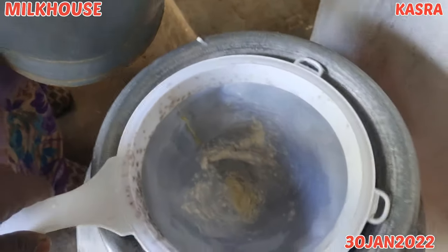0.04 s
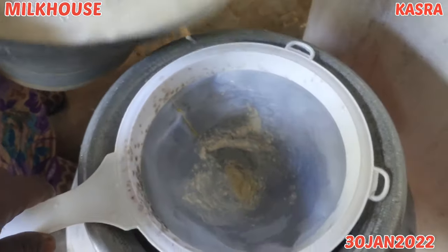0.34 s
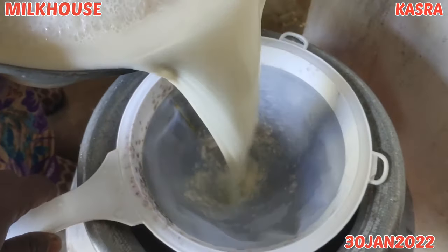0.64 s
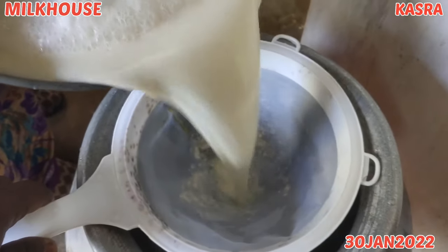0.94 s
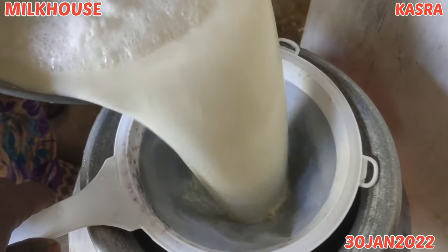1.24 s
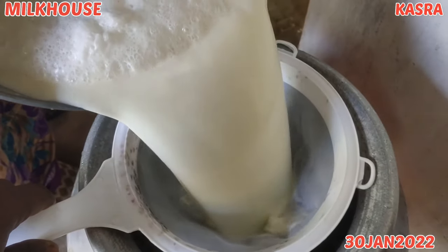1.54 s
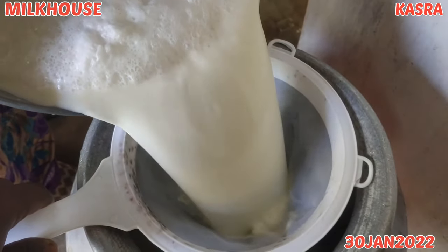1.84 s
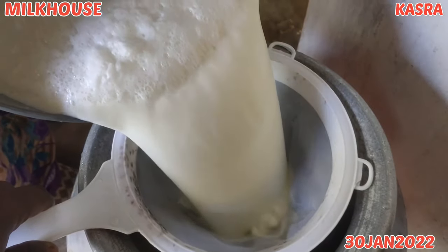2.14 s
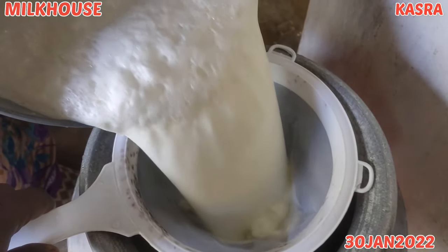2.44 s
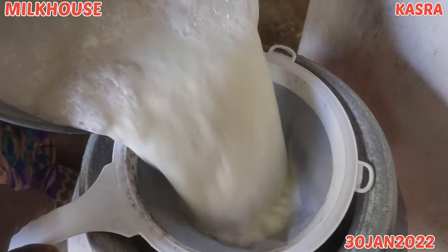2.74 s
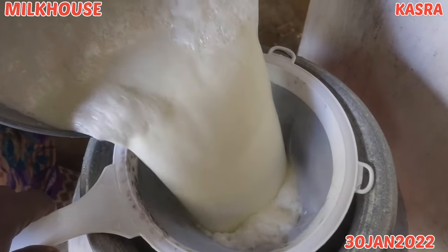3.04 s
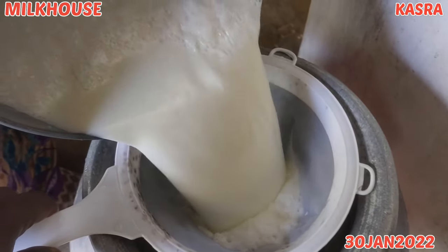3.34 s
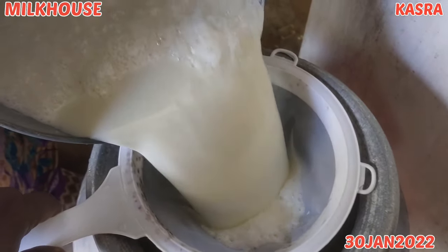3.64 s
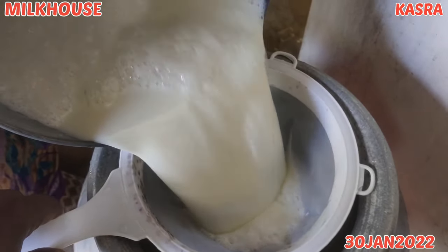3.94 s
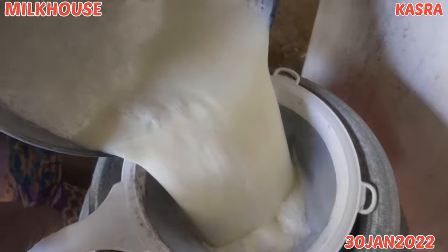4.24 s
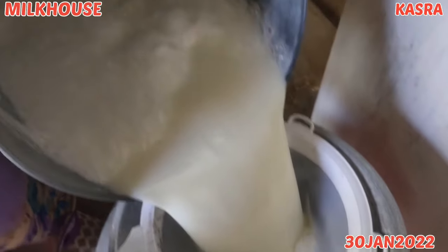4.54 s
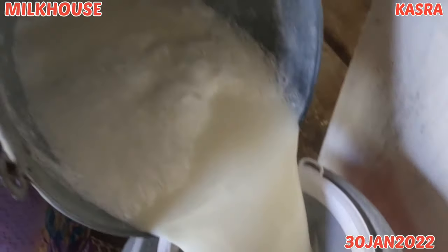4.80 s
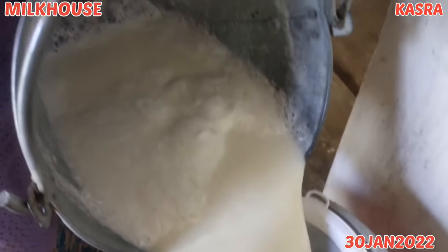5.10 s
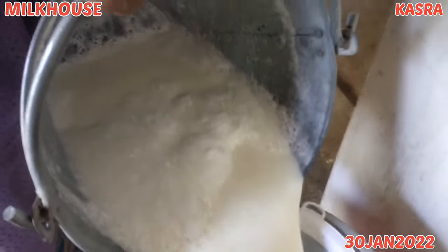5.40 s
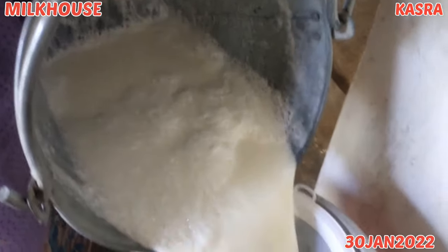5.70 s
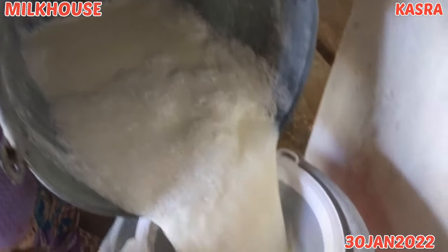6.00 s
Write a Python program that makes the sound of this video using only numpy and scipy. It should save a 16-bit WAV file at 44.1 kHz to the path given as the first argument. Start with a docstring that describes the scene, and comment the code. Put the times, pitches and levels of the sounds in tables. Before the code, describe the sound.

Milk slides softly in a metal pail, then slaps and spatters on the bare mesh of a plastic strainer. The stream swells into a bubbling splash, and the gurgle deepens as the strainer fills. Air gulps past the rim, froth hisses and the metal can below drones faintly. The pour then thins to a lighter, hollow trickle. It is heard close up in a small, hard room.

```python
"""Milk through a strainer

Close by, milk is tipped from a metal pail through a plastic strainer into a metal can.
It slides softly in the pail and slaps the bare mesh, then the stream drives clouds of ringing bubbles
into a pool. The gurgle deepens as the strainer fills and thins as the pour eases. Air gulps past
the rim, froth hisses, and the air in the can drones below, climbing as the can fills."""
import sys
import numpy as np
from scipy import signal
from scipy.io import wavfile
from scipy.ndimage import uniform_filter1d

SR = 44100
rng = np.random.default_rng(int(sys.argv[2]) if len(sys.argv) > 2 else 0)


def wav_record(signal):
    """Record a signal, one row per channel, as 16-bit PCM in the file named by sys.argv[1]."""
    frames = np.transpose(np.atleast_2d(signal))
    bounded = np.clip(frames, -1, 1)
    # unit amplitude maps onto the largest positive 16-bit level
    quanta = np.round(bounded * 32767).astype(np.int16)
    wavfile.write(sys.argv[1], SR, quanta)


N = 276066
T = np.arange(N) / SR
STEADY_DB = -48  # force of a steady pour

# force of the stream: it sputters, breaks off, pours fully and eases (time [s], level [dB])
POUR_FORCE = [(.68, -54.5), (.74, -55.5), (.808, -46), (.845, -49.5), (.89, -48.5), (.918, -50), (.97, -47),
              (1.0, -53.5), (1.045, -40.5), (1.06, -54), (1.09, -48.5), (1.11, -59), (1.15, -56),
              (1.19, -46), (1.33, -47), (1.42, -42), (1.52, -41.5), (1.6, -38.5), (1.8, -38.5),
              (2.08, -37.5), (2.42, -43), (2.8, -42.5), (3.72, -47.5), (3.95, -46), (4.4, -47.5),
              (4.83, -51.5), (4.93, -49), (4.99, -50), (5.08, -52), (5.3, -53), (6.05, -56.5), (6.16, -54),
              (6.26, -56.5)]
# the pool in the strainer (time [s], depth [0 bare mesh to 1 full])
POOL_DEPTH = [(.7, 0), (1.15, 0.07), (1.45, 0.37), (2.05, 0.7), (2.55, 0.72), (2.95, 0.89), (4.4, 0.94),
              (5.1, 0.8), (5.75, 0.68), (6.26, 0.75)]
# tone of each bubble size, largest first, then of the froth (frequency [Hz], level [dB])
GURGLE_EQ = [(200, -17.5), (270, -1.5), (400, -5), (650, 1), (800, 4.5), (950, 3), (1150, -2)]
BURBLE_EQ = [(750, -49.5), (950, -1), (1100, 3), (1400, 3), (1700, 1.5), (2100, -34)]
SPLASH_EQ = [(1350, -14.5), (1750, 6), (2300, 2), (3000, 5), (3550, 5.5), (4300, -0.5)]
PATTER_EQ = [(2900, -26), (3650, 3), (4250, -4), (4800, 1.5), (5450, 1.5), (5900, -3), (7000, -19)]
FIZZ_EQ = [(5200, -19), (6400, 2), (7300, 0.5), (9000, 1.5), (10900, 3), (12700, -3), (14200, 0),
           (15400, 2)]
FROTH_EQ = [(9000, -18), (12700, -3), (14000, -7), (15400, 5), (16000, -15)]
# bubble clouds, gurgle to patter
# (rate [1/s], nominal decay [cycles], surge depth [dB], level spread [dB], wash [dB])
CLOUDS = [(800, 6.2, 2.5, 3.5, 0), (527.5, 3.45, 2.5, 1, 8), (979, 11.4, 2, 0, 3), (1487, 13.8, 2, 6, 7)]
# a deeper pool traps larger bubbles: the mix, gurgle to fizz (bare mesh [dB], half full [dB], full [dB])
SIZE_MIX = [(-25.5, -17.5, -3.5), (-14.5, -7, -2.5), (-7.5, -1, -1), (-4, 0.97, -3.5), (-3, -8.5, -11.5)]
# air modes above the pool; the lower gives way to the upper (time [s], pitch [Hz], level [dB])
LOW_POOL_MODE = [(1.3, 1184, -5.5), (1.75, 1106, -9), (2.1, 1110, -1), (2.3, 1110, 2), (2.5, 1085, 4),
                 (2.75, 1175, 1.5), (3.1, 1186, -1.5), (3.35, 1190, -16)]
HIGH_POOL_MODE = [(1.3, 1254, 0), (1.8, 1340, -14), (2.8, 1365, -4.5), (3.15, 1340, -2), (3.5, 1340, -3.5),
                  (3.85, 1340, 0), (4.5, 1348, -3), (4.75, 1370, -24), (5.4, 1440, -4.5)]
# their overtones (pitch [multiple of the mode], width [Hz], level [dB])
POOL_OVERTONES = [(1.131, 62, -1.5), (1.705, 70.5, -2), (1.885, 65, -6.5), (2.25, 88, -9)]
# air modes of the can, of a gulp in it, and above the bare mesh (pitch [Hz], width [Hz], level [dB])
CAN_MODES = [(470, 32, 9), (637, 34, -1), (710, 58, -2), (1694, 49, 0.5), (1881, 13, -4.5), (2875, 63, -1),
             (3020, 48, -9), (3330, 37, -3), (4230, 270, -0.5)]
GULP_MODES = [(219, 53, 8), (298, 23, -10.5), (386, 25, 2), (509, 43, 5), (648, 43, 5), (720, 100, -1),
              (980, 210, -2.5)]
BARE_MESH_MODES = [(737, 68, 6), (1274, 130, -14), (1790, 78, 5), (2550, 33, -11), (2900, 47, -10),
                   (3880, 170, 5.5), (4250, 150, 2), (4720, 330, 7), (5130, 330, 6.5)]
# the largest bubbles, and knocks near 1300 Hz that ring the air above the pool (time [s], level [dB], pitch
# [Hz], decay [s], spray against the ring [dB])
PLOPS = [(0.821, -50, 1290, 0.0027, -4), (.86, -43, 1240, .003, 0.5), (0.885, -38, 3970, 0.0027, -8),
         (0.966, -41, 4100, 0.0012, 3), (1.024, -42, 4770, .002, 0), (1.038, -46, 2130, .003, -8),
         (1.038, -39.5, 4600, 0.0022, 3.5), (1.069, -19, 4830, 0.00085, -22),
         (1.095, -43, 1280, .003, -8), (1.289, -38.5, 1245, 0.0088, -9),
         (1.293, -36, 2080, 0.0046, -9), (1.449, -30, 2920, 0.0047, 0), (1.594, -31, 2120, 0.0036, 5),
         (1.651, -29.5, 2320, 0.0052, -15), (1.6924, -32.5, 1335, 0.0045, -21),
         (1.737, -31, 1820, 0.006, -12), (1.765, -30.5, 4150, .0026, -0.5),
         (1.804, -27, 2550, 0.0028, 6.5), (2.0728, -31, 1350, 0.0036, 2),
         (2.075, -28.5, 460, 0.014, -16), (2.131, -33.5, 629, 0.018, -24),
         (2.335, -39, 1130, .006, -12), (2.39, -20.5, 1268, 0.0057, -7),
         (2.706, -38.5, 414, 0.037, -19), (2.8255, -30.5, 1160, 0.0043, -15),
         (2.827, -24.5, 1580, 0.0022, -5), (2.855, -28.5, 1280, 0.0028, -1),
         (2.9162, -34, 5060, 0.0018, -13), (3.0613, -33, 1346, 0.004, -12),
         (3.128, -27, 1290, 0.0034, -10), (3.297, -32, 1330, 0.0053, -6),
         (3.325, -31.5, 4500, 0.0011, -7), (3.372, -32.5, 1300, 0.0024, -3),
         (3.449, -35, 5300, .002, -7), (3.586, -33.5, 1256, 0.003, 7.5),
         (3.793, -36, 1322, 0.0085, -18), (3.839, -36, 1300, 0.0037, -13),
         (3.866, -32, 1327, 0.012, -18), (3.932, -33, 1254, 0.0081, -16),
         (4.111, -39, 1000, 0.016, -12), (4.444, -39, 2380, 0.0046, -19),
         (4.495, -40, 1340, 0.025, -15), (4.565, -31, 2750, 0.0022, -9),
         (4.605, -41.5, 3000, 0.0042, 6), (4.618, -41, 2330, .004, 2),
         (4.708, -38.5, 970, 0.0067, -13), (4.754, -41.5, 2920, 0.0057, 5),
         (4.768, -35, 2650, 0.0045, -10), (4.875, -37, 1520, 0.0029, -1),
         (4.953, -39.5, 4300, 0.0053, -7), (4.968, -39, 4260, .003, -7),
         (4.998, -38.5, 3400, 0.0025, 1), (5.116, -41, 3320, .004, -10),
         (5.176, -42, 3900, .004, -15), (5.275, -42.5, 936, 0.0048, -5),
         (5.333, -38, 3500, 0.0023, -15), (5.4484, -47, 2820, .002, 0),
         (5.491, -37.5, 2580, 0.0058, -13), (5.602, -35.5, 3460, 0.003, -4.5),
         (5.623, -42, 2780, 0.0035, -12), (5.746, -42, 3000, .003, -10),
         (5.8152, -42.5, 3430, 0.0035, 0.5), (5.844, -45, 1110, 0.0035, 4),
         (5.996, -39.5, 1030, 0.0072, 4), (6.0795, -44, 1550, 0.0054, -17),
         (6.0979, -45, 3100, 0.0039, -16), (6.15, -40, 4680, 0.0048, -6),
         (6.241, -38, 4160, 0.0026, -19)]
# bubble chains as the pool closes over the mesh (start [s], end [s], pitch [Hz], level [dB])
BUBBLE_CHAINS = [(1.353, 1.38, 3150, -36), (1.402, 1.45, 3150, -40), (1.51, 1.567, 3170, -36.5),
                 (1.75, 1.835, 3190, -38)]
# air gulps past the strainer rim (time [s], level [dB], decay [s], pitch [Hz])
AIR_GULPS = [(1.581, -53.5, 0.0085, 840), (1.751, -53.5, 0.017, 750), (1.872, -53, 0.034, 680),
             (1.999, -51, 0.012, 680), (2.235, -55.5, 0.014, 490), (2.855, -59.5, 0.061, 660),
             (2.92, -59, .03, 630), (3.011, -55, .015, 816), (3.093, -51.5, .045, 394),
             (3.251, -58, .025, 634), (3.366, -52.5, 0.028, 666), (3.458, -60, 0.01, 495),
             (3.66, -51, 0.017, 630), (3.835, -56, 0.018, 486), (3.922, -55, 0.0096, 716),
             (3.991, -56.5, 0.017, 376), (4.286, -53.5, 0.028, 730), (4.348, -52, 0.038, 620),
             (4.436, -56, 0.027, 520), (4.692, -55.5, 0.024, 300)]
# first milk on the bare mesh (time [s], thump [dB], tick [dB])
MESH_SLAPS = [(0.654, -41, -60), (.673, -47, -48), (0.71, -58, -44), (0.7456, -60, -45), (0.7608, -70, -43),
              (0.7742, -70, -45), (0.7895, -66, -39.5), (0.804, -66, -43), (0.814, -60, -47),
              (0.827, -73, -46), (0.884, -55, -46), (0.9335, -54, -56), (0.9652, -56, -55),
              (1.0064, -59, -46), (1.069, -70, -37)]
# modes of the strainer on the can (pitch [Hz], level [dB], t60 [s])
STRAINER_MODES = [(193.5, -3, 0.2), (228, -5.5, 0.093), (387, -7.5, 0.02), (700, -9.5, 0.033),
                  (1090, -31, 0.018)]
# bursting clumps of froth (time [s], level [dB], decay [s], low cut [Hz])
FROTH_POPS = [(3.1924, -37, .008, 5540), (3.355, -38, .003, 7500), (3.928, -37, 0.017, 6000),
              (4.229, -37, 0.0065, 10800)]
# the emptying pail leans over the strainer (time [s], share of the splash in it [0-1], tilt [0-1])
PAIL_LEAN = [(4.1, 0.6, 0.16), (4.6, 1, 0.17), (4.95, 1, 0.53), (5.4, 1, 0.9), (6.26, 1, 1)]
# its air modes (pitch at tilt 0 [Hz], pitch at tilt 1 [Hz], width [Hz], level [dB])
PAIL_AIR_MODES = [(730, 820, 240, -5.5), (1026, 990, 84, -2), (1384, 1530, 88, -3.5), (1590, 1500, 49, 1),
                  (2300, 2520, 280, -1.5), (2540, 2766, 78, -1.5), (3000, 3400, 135, -3),
                  (3720, 3600, 110, -7), (4190, 4100, 170, -4.5), (4660, 4700, 120, -0.5)]
# milk slides in the tilting pail (middle [s], half length [s], level [dB])
PAIL_SLIDES = [(0, 0.041, -62), (0.164, 0.1, -68.5), (0.443, 0.054, -66)]
# modes of the pail (pitch [Hz], width [Hz], level [dB], swell peak [s], half length [s], glide [Hz/s])
PAIL_MODES = [(734, 140, -8, 0.05, 0.17, 0), (1113, 87, 2.5, 0.081, 0.21, 207),
              (1278, 61, 6.5, 0.26, 0.28, 64), (1650, 110, -9, .46, 0.065, 0),
              (1880, 90, -0.5, 0.5, 0.1, -5), (2250, 280, -2, 0.055, 0.13, -900),
              (2270, 70, -5, .46, .06, 0), (2610, 190, -5, 0.058, 0.23, -200), (2560, 78, -7, .46, .06, 0),
              (2820, 90, 10, 0.3, 0.1, 0), (3180, 140, 3.5, 0.32, 0.23, -300),
              (3380, 260, -4.5, 0.067, 0.3, 2), (3840, 350, -2, .44, 0.09, -900),
              (4000, 360, -1, 0.25, 0.3, 500), (4390, 130, 3, .5, 0.17, 0),
              (4700, 210, 0.5, 0.25, 0.19, -150), (5240, 200, -1.5, 0.5, 0.14, 2)]
# the drone's trim by pool depth (bare mesh [dB], half full [dB], full [dB])
DRONE_TRIM = (-44.5, -52.5, -41)
# tone of handling and churning (frequency [Hz], level [dB])
RUMBLE_EQ = [(25, -19), (55, -16), (90, -2.5), (140, -2.5), (200, 13.5), (270, 2.5), (330, 0)]


def stream(wander_db=1.0, gurgle_wander_db=-1.0):
    """Five sizes of bubble ride the surges of the stream, under a hissing head of froth."""
    force_db, = curve(POUR_FORCE)
    depth, = curve(POOL_DEPTH)
    *levels_db, fizz_db = [force_db + by_depth(*mix) + wander_db * wander(3, 12) for mix in SIZE_MIX]
    levels_db[0] += gurgle_wander_db * wander(4, 14)
    # a thin stream is more uneven, most of all on the bare mesh
    uneven = 0.95 * np.exp(0.018 * (STEADY_DB - force_db)) + 0.2 * np.exp(-depth / 0.061)
    folds = surges(per_s=60, decay=0.0083)
    flutter = (folds - uniform_filter1d(folds, size=4000)) * uneven  # only the fast movement
    tones = [GURGLE_EQ, BURBLE_EQ, SPLASH_EQ, PATTER_EQ]
    clouds = [bubble_cloud(tone, flutter, uneven, *row) for tone, row in zip(tones, CLOUDS)]
    air_hz, air_db = np.stack([curve(LOW_POOL_MODE), curve(HIGH_POOL_MODE)], axis=1)
    clouds[1] += sum(gain(db) * pool_hollow(hz) for hz, db in zip(air_hz, air_db))
    milk = sum(gain(db) * unit_rms(can_ring(cloud)) for cloud, db in zip(clouds, levels_db))
    leads = gain(air_db) / np.linalg.norm(gain(air_db), axis=0)  # the stronger mode lends its overtones
    overtones = sum(lead * gain(db) * resonate(milk, hz * multiple, width)
                    for hz, lead in zip(air_hz, leads) for multiple, width, db in POOL_OVERTONES)
    spits = bubble_cloud(FIZZ_EQ, flutter, uneven,
                         per_s=380, cycles=20, surge_db=4, spread_db=-0.5, wash_db=-10)
    ticks = spray(2.4 * flutter)
    fizz = gain(fizz_db) * unit_rms(ticks + gain(-4.5) * spits)
    hiss = unit_rms(eq(noise(N) * gain(flutter), FROTH_EQ))
    froth = gain(0.32 * fizz_db - 49.5) * hiss  # follows the stream only in part
    return landed() * (gain(-4) * (milk + overtones) + fizz + froth)


def bubble_cloud(tone, flutter, uneven, per_s, cycles, surge_db, spread_db, wash_db):
    """Bubbles of many pitches and sizes, over the wash of those too small to tell apart."""
    out, chance = np.zeros(N), rng.random((10000, 4))
    low_hz, high_hz = tone[1][0], tone[-2][0]
    for place, pitch, size, damping in chance[:int(per_s * T[-1])]:
        hz, at = low_hz + (high_hz - low_hz) * pitch, int(place * N)
        db = spread_db * min(-np.log(size), 3.2) + surge_db * flutter[at]
        # bubbles ring longer and stand clearer of the wash where the stream is thin
        decay = uneven[at] * cycles / hz * 2 ** (2 * damping - 1)
        add(out, T[at], gain(db) * bubble(hz, decay))
    wash = unit_rms(noise(N) * gain(surge_db * flutter) / np.sqrt(uneven))
    return unit_rms(eq(unit_rms(out) + gain(wash_db) * wash, tone))


def bubble(hz, decay, rise=0.013):
    """A trapped bubble swells within a cycle, rings down and chirps slightly upward."""
    t = np.arange(int(6 * decay * SR) + 16) / SR
    ring = np.sin(2 * np.pi * hz * t * (1 + rise * t / decay / 2)) * np.exp(-t / decay)
    return ring * (1 - np.exp(-t * hz))


def surges(per_s, decay):
    """Folds of the stream collapse one after another: sudden rises that die away."""
    gaps, sizes = rng.random((2, 2000))
    at = (np.cumsum(.15 + 1.7 * gaps) / per_s * SR).astype(int)
    kicks = np.bincount(at[at < N], .5 + sizes[at < N], N)
    swell = signal.lfilter([1], [1, -np.exp(-1 / (decay * SR))], kicks)
    return unit_rms(swell - swell.mean())


def pool_hollow(hz, width=90, churn_db=-6):
    """Bursting bubbles knock on the air above the pool, which rings at one of its modes."""
    onsets = np.diff(surges(per_s=42, decay=.002), prepend=0)
    knocks = unit_rms(np.maximum(onsets, 0))
    return unit_rms(band(knocks + gain(churn_db) * noise(N), hz, width))


def spray(surge_db, per_s=350, spread_db=-1.0, wash_db=6.0, decay_s=0.0025):
    """Droplets and bursting froth: tiny bright ticks in a wash of hiss."""
    sizes = gain(spread_db * np.minimum(rng.exponential(1, N), 4.5)) * rng.choice([-1, 1], N)
    ticks = sizes * (rng.random(N) < per_s / SR)
    energy = signal.lfilter([1], [1, -np.exp(-1 / (decay_s * SR))], ticks ** 2)
    envelope = (unit_rms(np.sqrt(energy)) + gain(wash_db)) * gain(surge_db)
    return unit_rms(eq(envelope * noise(N), FIZZ_EQ))


def stray_bubbles(per_s=16, low_hz=1200, high_hz=5000, cycles=13, lift_db=4.5):
    """Mid-sized bubbles poke out of the stream at random, the more so where it is thin."""
    force_db, = curve(POUR_FORCE)
    out, chance = np.zeros(N), rng.random((400, 3))
    for place, pitch, _ in chance[:int(per_s * T[-1])]:
        hz, at = low_hz * (high_hz / low_hz) ** pitch, int(place * N)
        db = lift_db + STEADY_DB + 0.7 * (force_db[at] - STEADY_DB)
        add(out, T[at], gain(db) * bubble(hz, cycles / hz))
    return landed() * gain(by_depth(bare_db=2, half_db=-2.5, full_db=0)) * can_ring(out)


def plops(echo_s=.0035, echo_db=-9, spray_s=0.022, spray_width=0.45, crest_db=7):
    """A large bubble, or a knock on the air above the pool, rings, echoes off the strainer wall and trails a
    spray around its pitch."""
    out, t = np.zeros(N), np.arange(SR // 10) / SR
    for s, db, hz, decay, spray_db in PLOPS:
        ring = bubble(hz, decay)
        ring = gain(db) * ring / abs(ring).max()
        trail = unit_rms(band(noise(len(t)), hz, spray_width * hz)) * np.exp(-t / spray_s)
        add(out, s, ring)
        add(out, s + echo_s, gain(echo_db) * ring)
        add(out, s, gain(db + spray_db - crest_db) * trail)
    return eq(out, [(300, -11.5), (5400, 0.5), (6600, -5.5), (15000, 11)])


def glugs(attack_s=0.0069, breadth=0.66):
    """Each gulp of air is a short, rounded churn that rings the can's modes nearest its pitch."""
    out, t = np.zeros(N), np.arange(SR // 4) / SR
    for s, db, decay, hz in AIR_GULPS:
        envelope = np.minimum(t / attack_s, 1) * np.exp(-t / decay)
        churn = band(noise(len(t)), hz, breadth * hz) * envelope
        gulp = ring_modes(churn, GULP_MODES)
        power = np.sum(gulp ** 2) / (2 * decay * SR)
        add(out, s, gain(db) * gulp / np.sqrt(power))
    return out


def bubble_chains(per_s=125, detune=0.028, decay_s=0.0052, spread_db=2.5):
    """Bubbles of nearly one size follow each other closely, in a rough singing note."""
    out = np.zeros(N)
    for start, end, hz, db in BUBBLE_CHAINS:
        for k, (late, pitch, size) in enumerate(rng.uniform(-1, 1, (20, 3))):
            s = start + (k + late / 2) / per_s
            if s < end:
                add(out, s, gain(db + spread_db * size) * bubble(hz * (1 + detune * pitch), decay_s))
    return out


def mesh_slaps(tick_s=0.0012, splat_s=0.018, splat_db=-10.5, spatter_s=0.015, spatter_db=-12):
    """Milk thumps the dry strainer with a dull splat and ticks on its mesh, trailing fine spatter."""
    out, t = np.zeros(N), np.arange(SR // 4) / SR
    tick_eq = [(300, -38), (5000, 16), (6500, 7.5), (15000, 10)]
    splat_eq = [(200, -11), (1100, -1), (1700, -11), (4000, -7.5), (7000, -26), (15000, -17)]
    ring = sum(gain(db - 60 * t / t60) * np.sin(2 * np.pi * hz * t) for hz, db, t60 in STRAINER_MODES)
    tick_envelope = np.exp(-t / tick_s) + gain(spatter_db) * np.exp(-t / spatter_s)
    for s, thump_db, tick_db in MESH_SLAPS:
        tick = shaped_noise(len(t), tick_eq) * tick_envelope
        splat = shaped_noise(len(t), splat_eq) * np.exp(-t / splat_s)
        thump = eq(ring + gain(splat_db) * splat, [(160, 0), (15000, 0)])
        add(out, s, gain(thump_db) * thump + gain(tick_db + 2) * tick)
    return out


def froth_pops(crest_db=7):
    """A clump of froth bursts in a quick, bright crackle."""
    out, t = np.zeros(N), np.arange(SR // 10) / SR
    for s, db, decay, low_hz in FROTH_POPS:
        grit = noise(len(t)) * rng.exponential(1, len(t))
        crackle = unit_rms(eq(grit, [(low_hz, 0), (15400, 0)]))
        add(out, s, gain(db - crest_db) * crackle * np.exp(-t / decay))
    return out


def can_ring(x):
    """The direct sound plus the ringing air of the can."""
    click = signal.unit_impulse(4096)
    return signal.oaconvolve(x, click + ring_modes(click, CAN_MODES))[:len(x)]


def air_spaces(x, covered_depth=0.12):
    """The splash rings above the mesh until the pool covers it, and in the emptying pail at the end."""
    depth, = curve(POOL_DEPTH)
    share, tilt = curve(PAIL_LEAN)
    x = cavity(x, BARE_MESH_MODES, 1 - depth / covered_depth, direct_db=-10)
    modes = [(start + (end - start) * tilt, width, db) for start, end, width, db in PAIL_AIR_MODES]
    return cavity(x, modes, share, direct_db=-3)


def cavity(x, modes, share, direct_db):
    """A share of the sound passes through an air space, which favours its modes and dulls the rest."""
    share = np.clip(share, 0, 1)
    return (1 - share) * x + share * (gain(direct_db) * x + ring_modes(x, modes))


def pail_slide(rest_db=-13, hiss_db=-30, waver=.008, flicker_db=1.5, fade_s=.04):
    """Milk slides along the pail wall before it spills; the modes swell, waver and glide as it tilts."""
    out, t = np.zeros(N), T[T < .7]
    slide = noise(len(t)) * gain(1.4 * surges(per_s=45, decay=0.012)[:len(t)])
    hiss_eq = [(500, 0), (2500, -2), (5200, 9), (7000, 1), (9000, -20), (15000, -29)]
    ringing = gain(hiss_db) * eq(slide, hiss_eq)
    for hz, width, db, s, half, glide in PAIL_MODES:
        drift = uniform_filter1d(uniform_filter1d(noise((2, len(t))), size=1500), size=1500)
        bend, flicker = map(unit_rms, drift)
        swell = (gain(rest_db) + np.exp(-((t - s) / half) ** 2)) * gain(flicker_db * flicker)
        pitch = hz * (1 + waver * bend) + glide * (t - s)
        ringing += gain(db) * swell * band(slide, pitch, width)
    add(out, 0, levelled(ringing, 3000) * np.minimum((t[-1] - t) / fade_s, 1))
    return slide_envelope() * out


def slide_envelope(rest_db=-78.5):
    """Each slide of milk in the pail swells and fades."""
    swells = sum(gain(db) ** 2 * np.exp(-((T - s) / half) ** 2) for s, half, db in PAIL_SLIDES)
    return np.sqrt(swells + gain(rest_db) ** 2)


def can_drone(empty_hz=176.3, filled=0.55, width=62, follow=0.42, wander_db=2.0):
    """The can's air booms at its neck and climbs as it fills, over a rumble of handling and churning."""
    force_db, = curve(POUR_FORCE)
    depth, = curve(POOL_DEPTH)
    pouring = landed()
    hz = empty_hz / np.sqrt(1 - filled * np.cumsum(depth) / depth.sum())
    pour_level = gain(follow * force_db + by_depth(*DRONE_TRIM) + wander_db * wander(2.2, 5.8))
    level = pouring * pour_level + (1 - pouring) * gain(-4) * slide_envelope()
    boom = unit_rms(band(noise(N), hz, width))
    churn_db, handling_db = -4.5 + follow * (force_db - STEADY_DB), -2
    rumble = gain(pouring * churn_db + (1 - pouring) * handling_db) * shaped_noise(N, RUMBLE_EQ)
    low_end = eq(boom + rumble, [(20, 8), (230, -2), (330, -11.5)])
    return level * levelled(low_end, 5000)


def room_reverb(x, t60=0.31, per_s=3000, predelay_s=.004):
    """A small hard room: sparse reflections that die quickly."""
    t = np.arange(SR // 2) / SR
    taps = noise(len(t)) * (rng.random(len(t)) < per_s / SR) * (t > predelay_s)
    tail = eq(taps * gain(-60 * t / t60), [(100, 2.2), (5000, 4.6), (15000, 2.6)])
    return signal.oaconvolve(x, tail / np.linalg.norm(tail))[:N]


def room_tone():
    """Still air: a faint bed of rumble and hiss."""
    return gain(-92.5) * shaped_noise(N, [(25, -1), (100, 23), (400, -10), (3000, -9), (15000, 6)])


def landed():
    """A gate that opens as the first milk reaches the mesh."""
    return np.clip((T - .671) / .004, 0, 1)


def by_depth(bare_db, half_db, full_db):
    """A level that rides the depth of the pool."""
    depth, = curve(POOL_DEPTH)
    return np.polyval(np.polyfit([0, .5, 1], [bare_db, half_db, full_db], 2), depth)


def wander(low_hz, high_hz, count=16):
    """Slow random modulation, rms 1."""
    rates, phases = np.geomspace(low_hz, high_hz, count), rng.random(count)
    t = T[::256]
    waves = np.sin(2 * np.pi * (np.outer(t, rates) + phases))
    return unit_rms(np.interp(T, t, waves.sum(1)))


def resonate(x, hz, width):
    """A resonance of gain 1 at a fixed or moving pitch."""
    turn = np.exp(2j * np.pi * np.cumsum(hz * np.ones(len(x))) / SR)
    pole = np.exp(-np.pi * width / SR)
    return 2 * (turn * signal.lfilter([1 - pole], [1, -pole], x / turn + 1e-18)).real


def band(x, hz, width):
    """Two resonances in series, for steeper skirts."""
    return resonate(resonate(x, hz, width), hz, width)


def ring_modes(x, modes):
    """A bank of resonances in parallel."""
    return sum(gain(db) * resonate(x, hz, width) for hz, width, db in modes)


def eq(x, points, size=4096):
    """Minimum-phase EQ through (frequency [Hz], level [dB]), falling 36 dB an octave past both ends."""
    hz, db = np.transpose(points)
    octave, knots = np.log2(abs(np.fft.fftfreq(size, 1 / SR)) + 1), np.log2(hz)
    outside = abs(octave - np.clip(octave, knots[0], knots[-1]))
    log_gain = np.log(gain(np.maximum(np.interp(octave, knots, db) - 36 * outside, -90)))
    taps = np.fft.ifft(np.exp(np.conj(signal.hilbert(log_gain)))).real
    return signal.oaconvolve(x, taps)[:len(x)]


def noise(shape):
    """White noise."""
    return rng.standard_normal(shape)


def shaped_noise(samples, tone):
    """Noise through an EQ, rms 1."""
    return unit_rms(eq(noise(samples), tone))


def gain(db):
    """Decibels to amplitude."""
    return 10 ** (np.asarray(db) / 20)


def unit_rms(x):
    """Scales to rms 1."""
    return x / np.sqrt(np.mean(x ** 2) + 1e-20)


def levelled(x, samples):
    """Holds the running rms near 1."""
    return x / np.sqrt(uniform_filter1d(x ** 2, size=samples))


def curve(rows):
    """One automation curve for each value column of a timed table."""
    s, *columns = np.transpose(rows)
    return [np.interp(T, s, column) for column in columns]


def add(mix, s, sound):
    """Mixes a sound in at time s."""
    part = mix[max(round(s * SR), 0):][:len(sound)]
    part += sound[:len(part)]


def scene():
    """The pour in its room, over still air, in mono."""
    milk = air_spaces(stream() + stray_bubbles())
    milk += plops() + glugs() + bubble_chains() + froth_pops() + mesh_slaps()
    air = room_tone()
    return (milk + gain(-13) * room_reverb(milk) + can_drone() + pail_slide() + air)[None]


def record(dry, cutoff_hz=15700):
    """A steep low-pass trims the very top of the mix."""
    lowpass = signal.firwin(511, cutoff_hz, window=("kaiser", 9), fs=SR)
    return signal.oaconvolve(dry, lowpass[None], "same")


dry = scene()
out = record(dry)
wav_record(out)
```